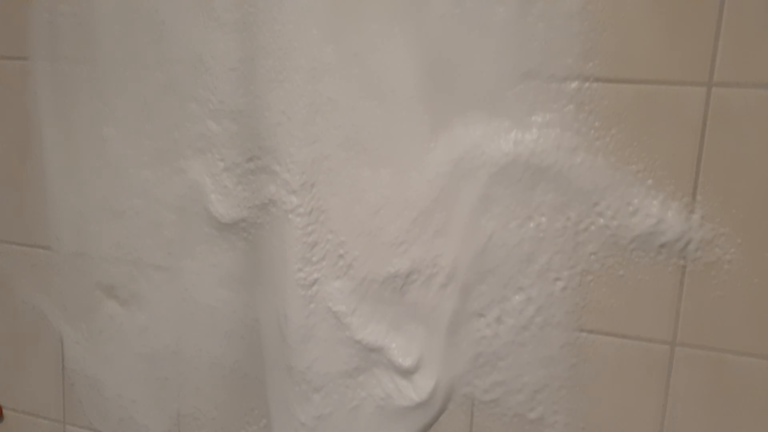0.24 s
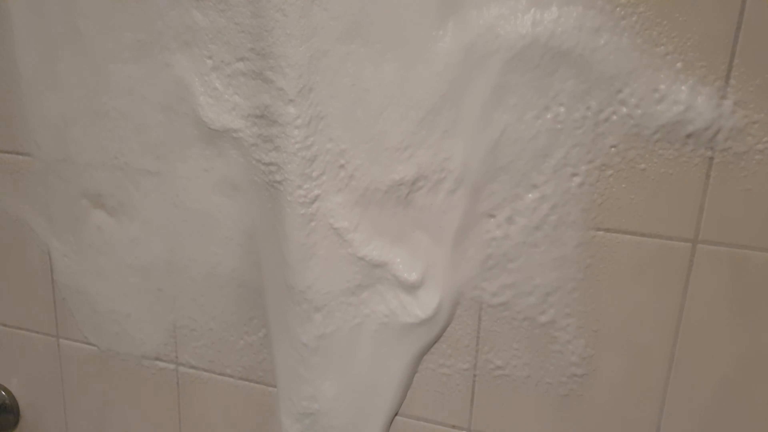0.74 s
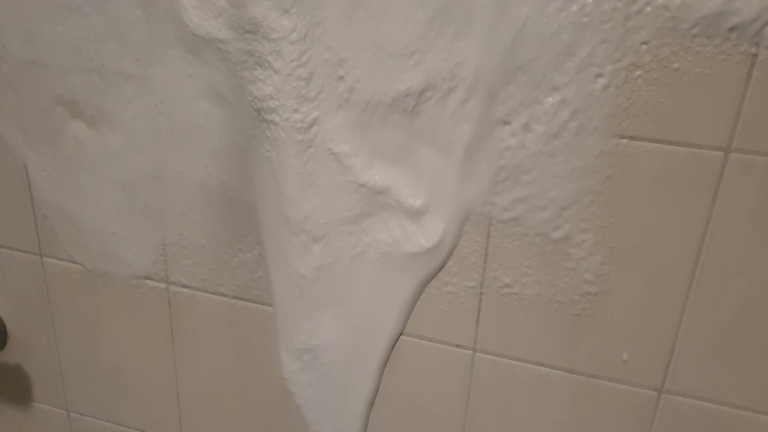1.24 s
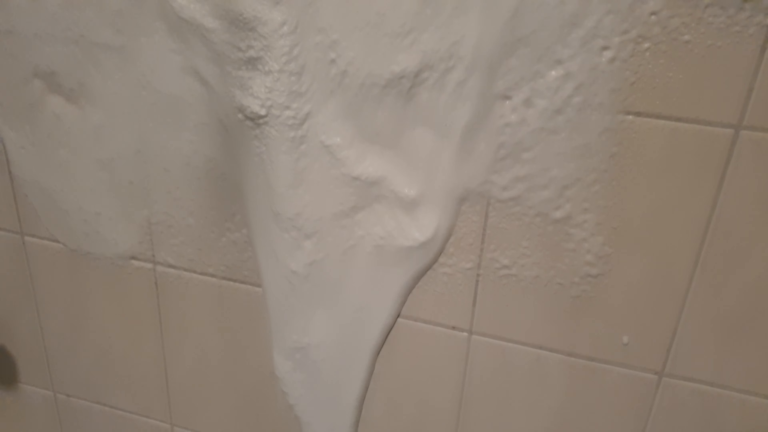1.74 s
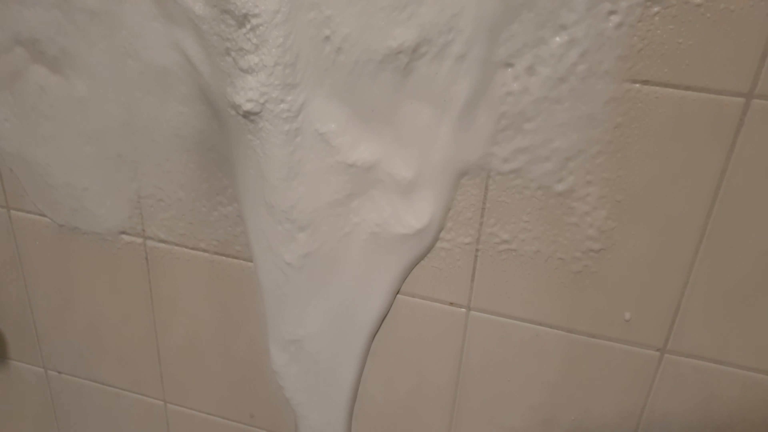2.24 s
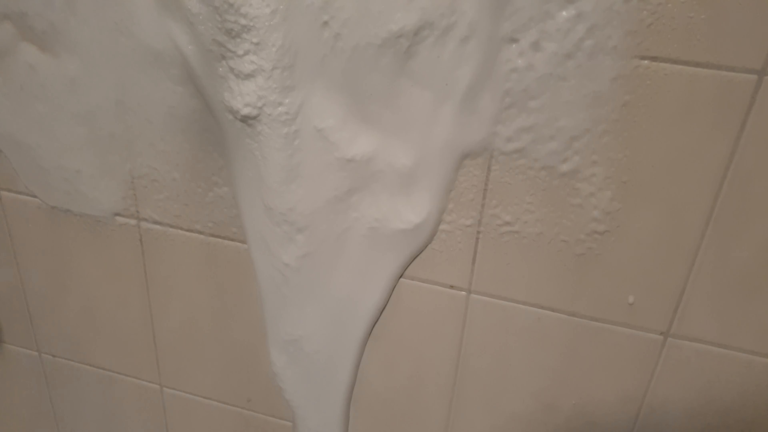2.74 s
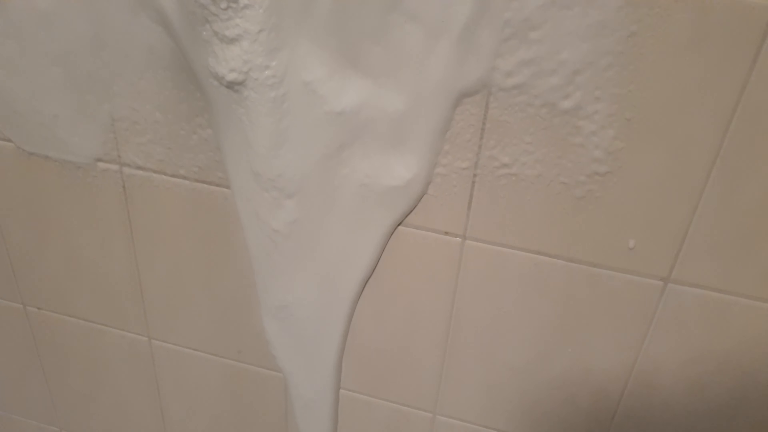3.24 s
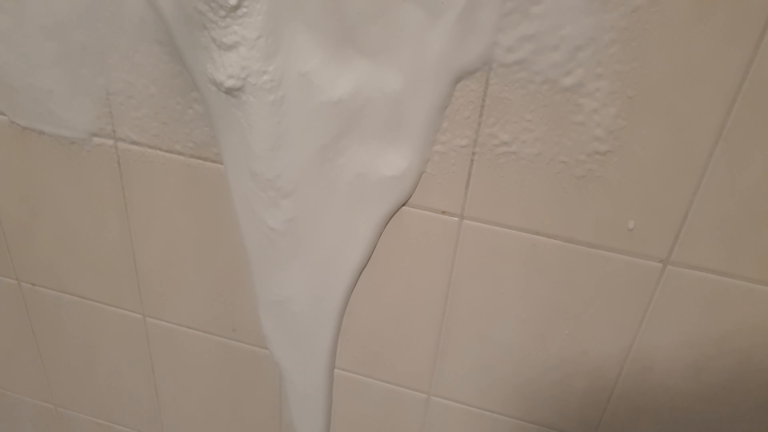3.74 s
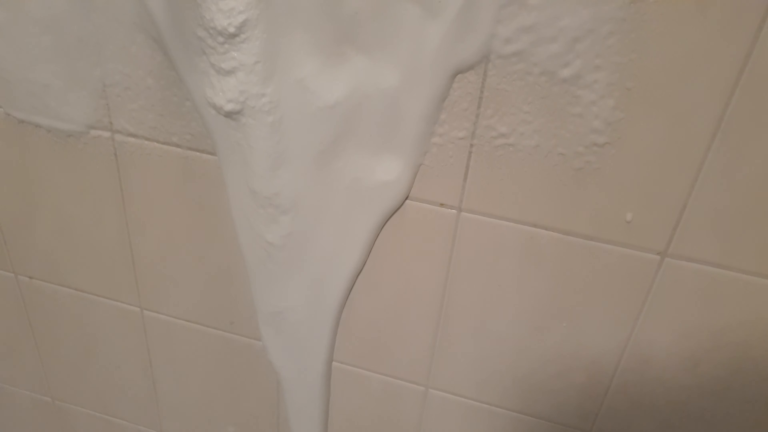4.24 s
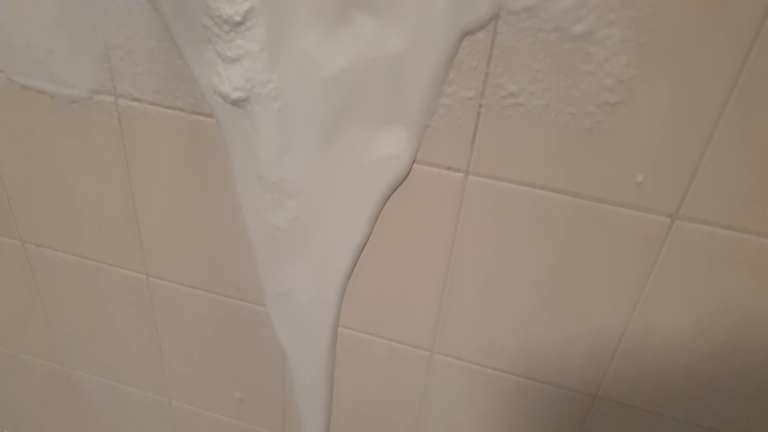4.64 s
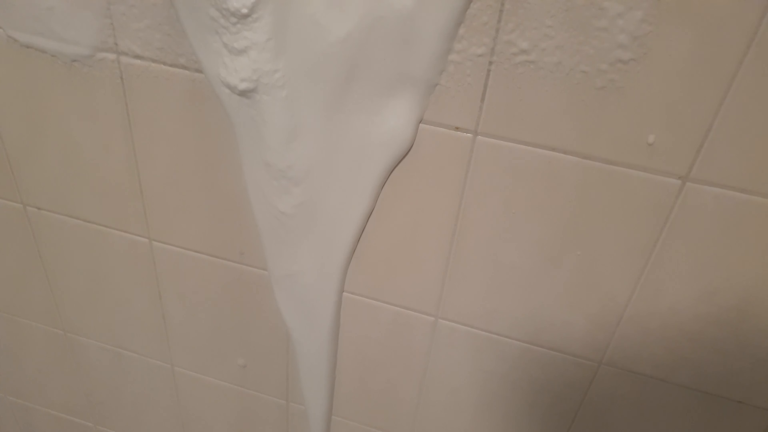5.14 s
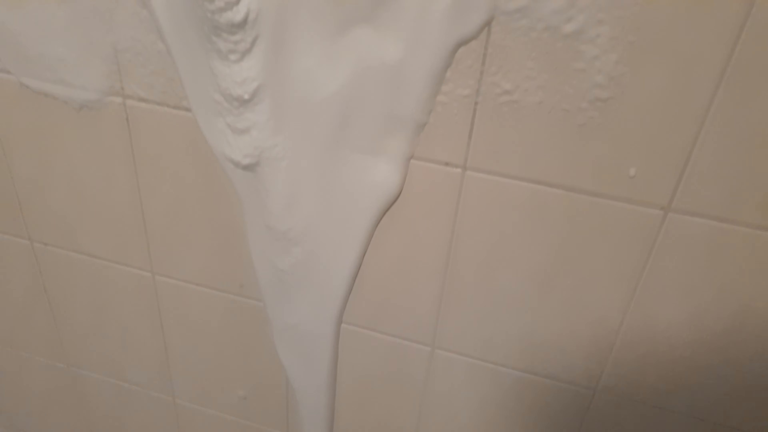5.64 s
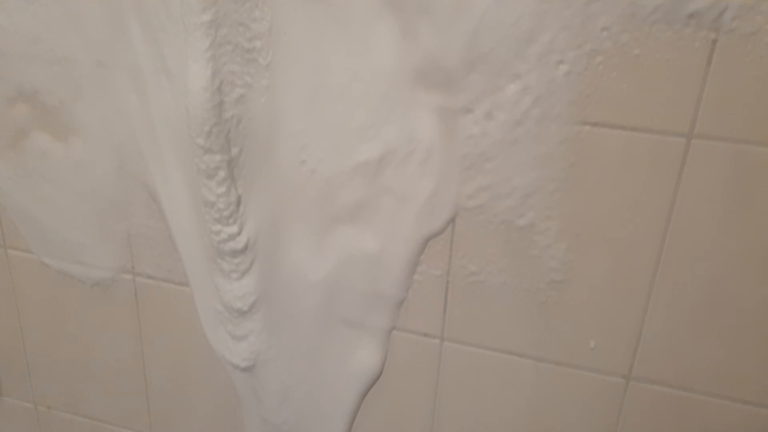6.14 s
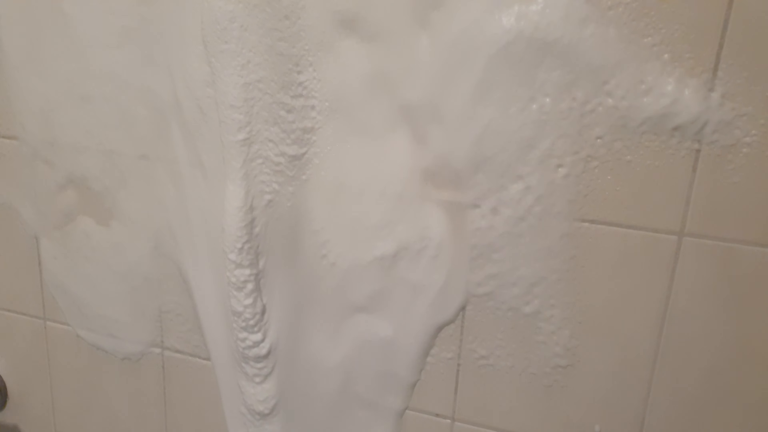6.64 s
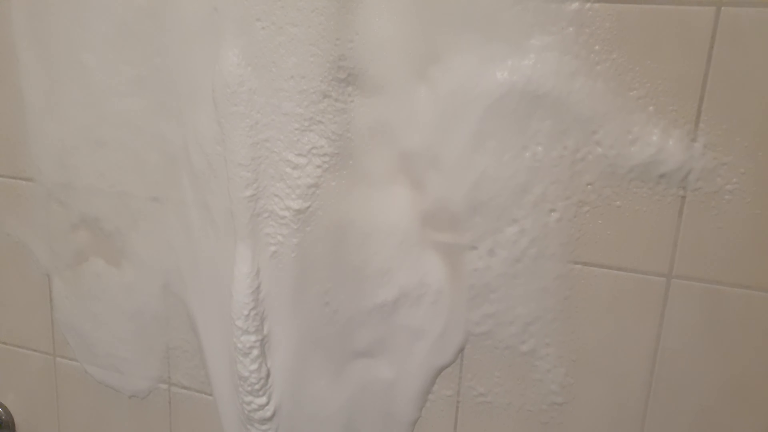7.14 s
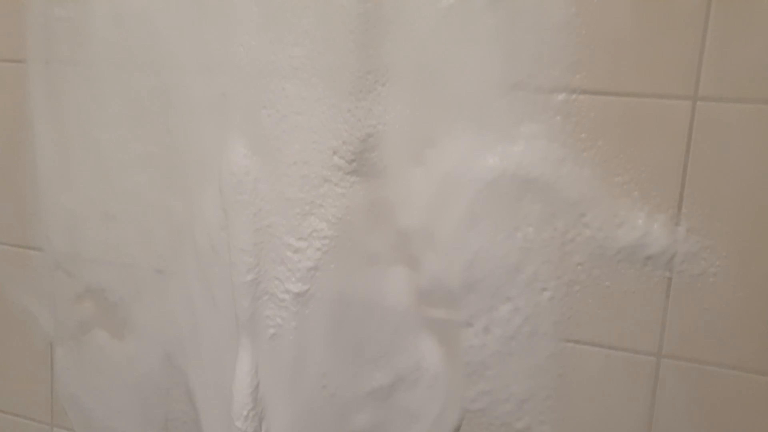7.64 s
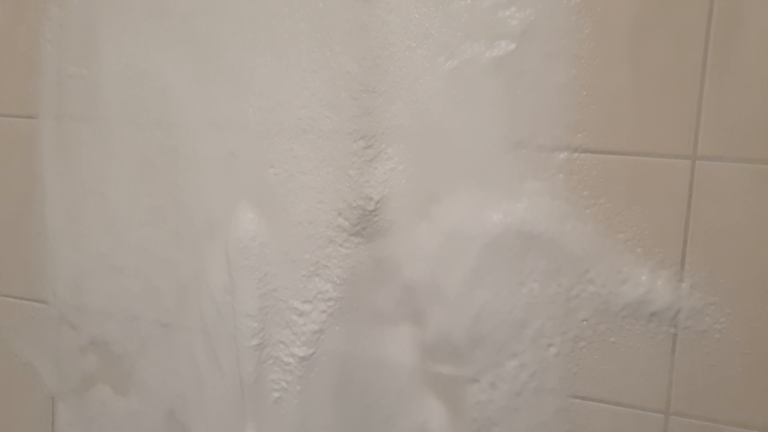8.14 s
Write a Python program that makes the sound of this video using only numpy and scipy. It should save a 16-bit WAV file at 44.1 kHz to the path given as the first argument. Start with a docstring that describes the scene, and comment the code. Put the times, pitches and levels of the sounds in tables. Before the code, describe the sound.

A pump sprayer hisses steadily and brightly at a tiled wall in a small hard room. The fizz flutters and surges slightly. Beneath it the jet howls breathily in the foam, its pitch sinking as it bores a hole, then rising again near six seconds. Close handheld stereo microphones catch soft handling thumps, a hollow plastic bump and a faint low hum.

```python
"""A bright, sputtering hiss: a pump sprayer shoots thick foam at a tiled wall in a small, hard room.
The hiss is noise that follows the flow; the wall's echo, a moving delay, combs it.
The jet howls in the foam, as noise in gliding resonances; the hole it bores adds overtones that sink as it deepens.
A low hum and rumble lie beneath; the hand-held camera thumps softly and a plastic tank bumps hollowly."""
import sys
import numpy as np
from scipy import signal
from scipy.fft import rfft, irfft, next_fast_len
from scipy.io import wavfile
from scipy.ndimage import uniform_filter1d, map_coordinates

SR = 44100
rng = np.random.default_rng(int(sys.argv[2]) if len(sys.argv) > 2 else 0)


def wrap_up_sound(samples):
    """Save the sound to the file named by the first command line argument, as 16-bit audio."""
    columns = np.atleast_2d(samples).T
    # keep every value between -1 and 1, then stretch to whole-number steps
    tamed = np.clip(columns, -1, 1)
    steps = np.round(tamed * 32767).astype(np.int16)
    wavfile.write(sys.argv[1], SR, steps)


N = 370435


def amp(db):
    """Decibels to gain."""
    return 10 ** (np.asarray(db) / 20)


def unit(x):
    """Scale to rms 1."""
    return x / np.sqrt(np.mean(x ** 2) + 1e-20)


def along(points, hz):
    """Interpolate (Hz, value) points on a log-frequency axis."""
    point_hz, value = np.transpose(points)
    return np.interp(np.log(hz + 1), np.log(point_hz + 1), value)


def curves(rows):
    """Interpolate each column after the time at every sample."""
    start_s, *columns = np.transpose(rows)
    t = np.arange(N) / SR
    return [np.interp(t, start_s, column) for column in columns]


def wobble(rate_hz):
    """Smooth random curve, rate_hz knots a second."""
    knots = rng.standard_normal(int(N * rate_hz / SR) + 4)
    return map_coordinates(knots, [np.arange(N) * rate_hz / SR])


def filtered(x, response):
    """Multiply the spectrum of x by a response of frequency in Hz."""
    m = next_fast_len(N + SR // 2)
    hz = np.fft.rfftfreq(m, 1 / SR)
    return irfft(rfft(x, m) * response(hz), m)[..., :N]


def coloured(x, spectrum):
    """Shape x by a spectrum, at rms 1."""
    return unit(filtered(x, lambda hz: amp(along(spectrum, hz))))


def delayed(x, delay_ms):
    """Delay x by a fixed or moving time, read from a 4x oversampled copy."""
    fine = signal.resample_poly(x, 4, 1)
    position = 4 * (np.arange(N) - delay_ms * SR / 1000)
    return np.interp(position, np.arange(len(fine)), fine)


def resonance(centre_hz, width_hz):
    """Noise of rms 1 in one resonance with steep skirts; centre and width fixed or per sample."""
    hz, t, z = signal.stft(rng.standard_normal(N), SR, nperseg=2048)
    sample_s = np.arange(N) / SR
    centre = np.interp(t, sample_s, centre_hz * np.ones(N))
    width = np.interp(t, sample_s, width_hz * np.ones(N))
    hz = hz[:, None] + 1
    detune = (hz ** 2 - centre ** 2) / (hz * width)
    shaped = z / (1 + detune ** 2) / np.sqrt(width)
    return unit(signal.istft(shaped, SR, nperseg=2048)[1][:N])


# left-right likeness in the room: (frequency_hz, likeness [0..1])
ALIKE = [(60, 0.8), (250, 0.85), (520, 0.86), (720, 0.74), (950, 0.2), (2000, 0.015)]


def diffuse(pair):
    """Turn two unrelated signals into a room field: alike in the bass, unrelated in the treble."""
    def mix(hz):
        angle = np.arccos(np.clip(along(ALIKE, hz), -1, 1)) / 2
        return np.array([np.cos(angle), np.sin(angle)])
    mid, side = filtered(pair, mix)
    return np.array([mid + side, mid - side])


def room(x, t60_s=0.47):
    """Tile reverberation at both microphones, as strong as x: decaying noise convolved with x."""
    t = np.arange(SR // 2) / SR
    tail = rng.standard_normal((2, len(t))) * amp(-60 * t / t60_s)
    tail /= np.linalg.norm(tail[0])
    running = np.pad(x, (len(t), 0), mode="wrap")[None]  # the room already sounds at the start
    wet = signal.fftconvolve(running, tail, axes=1)[:, len(t):][:, :N]
    return diffuse(wet)


# paths to the camera: (start_s, wall_echo_delay_ms, left_lead_ms, right_direct_db)
WALL = [(0, 1.68, .342, 0), (.6, 1.565, .313, 0), (1.3, 1.437, .32, -2), (2.2, 1.315, .322, -2),
        (2.7, 1.285, .321, -3.5), (3.6, 1.205, .317, -4.5), (5.45, 1.203, .305, -3.5),
        (6.3, 1.42, .312, -1), (6.85, 1.535, .29, 0), (7.3, 1.715, .268, 0), (7.9, 1.8, .268, 0),
        (8.4, 1.77, .279, 0)]
# the nozzle beams its top treble at the wall: (frequency_hz, echo_level_db)
BEAM = [(3000, -7), (9000, -6), (11800, 0)]


def direct(x, echo):
    """Sound reaches the left microphone first; the wall's echo reaches both together, stronger on the right."""
    wall_ms, lead_ms, right_db = curves(WALL)
    nearness = (wall_ms.min() / wall_ms) ** 2  # the echo fades as the wall recedes
    facing = np.array([[.55], [1]])  # echo gain: left, right
    beamed = filtered(x, lambda hz: amp(along(BEAM, hz)))
    first = np.array([x, amp(right_db) * delayed(x, lead_ms)])
    reflected = echo * facing * nearness * delayed(beamed, wall_ms)
    return unit(first + reflected)


def patchy(x, depth_db):
    """Narrow patches of the noise swell and fade at random."""
    z = signal.stft(x, nperseg=512)[2]
    field = uniform_filter1d(rng.standard_normal(z.shape), size=2, axis=1)  # across frequency
    field = uniform_filter1d(field, size=45, axis=2)  # across time
    return signal.istft(z * amp(depth_db * unit(field)), nperseg=512)[1][:, :N]


def hiss(spectrum, flow_db, echo, room_db, grain_db, patchy_db):
    """Tiny noise bursts heard directly, over a room wash that smears the flow's flutter."""
    bursts = rng.standard_normal(N) * amp(flow_db + grain_db * wobble(2500))
    smeared_db = uniform_filter1d(flow_db, size=1500)
    wash = patchy(diffuse(rng.standard_normal((2, N))), patchy_db) * amp(smeared_db)
    return unit(direct(coloured(bursts, spectrum), echo) + amp(room_db) * coloured(wash, spectrum))


# the jet's surges about its usual strength: (start_s, flow_db)
JET = [(0.0, 0), (0.42, -0.2), (0.81, 2), (1.1, -1), (1.34, 1), (1.51, -1.5), (1.94, 2), (2.03, -0.9),
       (2.1, 4.5), (2.16, 1), (2.36, 1.5), (2.64, 0), (3.15, 0.7), (3.19, 2), (3.63, 1.6), (3.78, 3.5),
       (3.83, 0.5), (4.06, -0.5), (4.13, -1.5), (4.41, 4), (4.54, 0.6), (4.68, 2.2), (4.81, 1), (4.86, 2),
       (5.05, -2.3), (5.25, 3), (5.29, 1), (5.56, 3.5), (5.75, 0.5), (5.78, -1.3), (6.08, 2.5), (6.15, 0.7),
       (6.54, 2.5), (6.85, 0.5), (7.13, 0.5), (7.28, -0.3), (7.52, -0.2), (8.03, 1), (8.12, 2),
       (8.41, -0.5)]
# spectrum of the bright fizz: (frequency_hz, relative_level_db)
FIZZ = [(3000, -40), (6000, -21), (7800, -15.5), (9000, -8.5), (10400, -8.8), (11300, -1.1), (13500, -.2),
        (15700, .9)]
# spectrum of the broad rush: (frequency_hz, relative_level_db)
RUSH = [(100, -32), (340, -17), (480, -5.5), (900, -4), (1400, -8.5), (2300, -0.84), (3300, 0.5),
        (5000, -3), (6500, -1.5), (7600, -6), (12000, -2), (16000, -23)]
FIZZ_DB, RUSH_DB = -20.5, -29  # at the usual flow, the rush at the mean echo delay
RUSH_DB_PER_FLOW_DB = 0.17
RUSH_DB_PER_MS = -2  # the rush fades as the wall's echo comes later


def nozzle(sputter_db=-0.07, flutter_db=1.6, rush_share=0.76, echo=.58):
    """Air and suds tear out unevenly: a bright fizz over a broad rush, both following the flow."""
    jet_db, = curves(JET)
    wall_ms = curves(WALL)[0]
    flow_db = sputter_db * wobble(35) + flutter_db * wobble(140)
    fizz = hiss(FIZZ, flow_db, echo, room_db=-2.5, grain_db=-1.0, patchy_db=3.4)
    rush = hiss(RUSH, rush_share * flow_db, echo, room_db=14.0, grain_db=3.0, patchy_db=3.0)
    distance_db = RUSH_DB_PER_MS * (wall_ms - wall_ms.mean())
    rush_db = RUSH_DB + RUSH_DB_PER_FLOW_DB * jet_db + distance_db
    return amp(FIZZ_DB + jet_db) * fizz + amp(rush_db) * rush


def throat(centre_hz=1460, width_hz=970, level_db=-44.5):
    """The nozzle's short tube rings broadly, close to the camera and dry."""
    return amp(level_db) * direct(resonance(centre_hz, width_hz), echo=0.05)


def from_wall(x, room_db, count=4):
    """Sound made in the foam, heard directly and through the room, as strong as x."""
    place = np.linspace(0, count - 1, N)  # the room answers differently as the camera moves
    answer = 0
    for k in range(count):
        fade = np.cos(np.pi / 2 * np.clip(place - k, -1, 1))
        answer = answer + fade * room(x)
    return np.std(x) * unit(direct(unit(x), echo=0.049) + amp(room_db) * unit(answer))


# bored hole's overtone, sinking as the hole deepens: (start_s, pitch_hz, level_db)
OVERTONE = [(0, 2450, -48), (.55, 2180, -43), (1.1, 1980, -40), (1.6, 1780, -37), (2.2, 1660, -40),
            (2.8, 1540, -36.5), (3.25, 1430, -37), (3.9, 1280, -38.5), (4.7, 1150, -40.5), (5.3, 1120, -40),
            (6, 1100, -54)]
# its upper overtone, sinking, then rising as the hole fills: (start_s, pitch_hz, level_db)
UPPER_OVERTONE = [(2, 2750, -48), (3, 2470, -42), (4.1, 2050, -48), (4.6, 1500, -43), (5, 1570, -38.5),
                  (5.55, 1680, -36), (5.8, 1690, -43), (6.1, 1760, -52)]
# shallow dent under a moving jet: (start_s, level_db)
DENT = [(.1, -39.5), (.7, -52), (5.5, -56), (6.1, -39), (7, -41.5), (8.4, -42.5)]


def overtones(bore_q=3.8, dent_hz=1110, dent_width_hz=400):
    """A bored hole rings in two gliding resonances, wider when higher; a dent rings mainly before and after."""
    hole = 0
    for rows in (OVERTONE, UPPER_OVERTONE):
        pitch_hz, level_db = curves(rows)
        hole = hole + amp(level_db) * resonance(pitch_hz, pitch_hz / bore_q)
    dent_db, = curves(DENT)
    return hole + amp(dent_db) * resonance(dent_hz, dent_width_hz)


# lowest resonance of the hollow dug in the foam, level before the bass cut:
# (start_s, pitch_hz, width_hz, level_db)
HOLLOW = [(0, 840, 300, -38), (.6, 700, 220, -35.5), (1.3, 650, 204, -34), (1.62, 620, 198, -30),
          (2, 606, 228, -33), (3.1, 588, 250, -32.5), (3.9, 560, 219, -35), (4.7, 582, 206, -35.5),
          (5.1, 554, 190, -32), (5.6, 595, 260, -35), (5.9, 740, 385, -37.5), (6.2, 910, 310, -36),
          (7.1, 890, 270, -37.5), (7.7, 836, 285, -38), (8.4, 760, 220, -33)]


def foam(churn_db=0.3, level_db=0, lowest_hz=455):
    """The jet churns the foam on the wall and blows across the hollow it has dug."""
    hollow_hz, width_hz, hollow_db = curves(HOLLOW)
    howl = amp(hollow_db) * resonance(hollow_hz, width_hz)
    # a small hollow radiates no bass
    howl = filtered(howl, lambda hz: 1 / np.hypot(1, (lowest_hz / (hz + 1)) ** 8))
    churn = amp(level_db + churn_db * wobble(45))
    return churn * (from_wall(howl, room_db=3.5) + from_wall(overtones(), room_db=15))


# spectrum of the room's rumble: (frequency_hz, relative_level_db)
FLOOR = [(20, -32), (40, -23), (55, -4), (75, -9), (100, 3.5), (125, -8.5), (200, -6.5), (280, -2.5),
         (500, -14), (1500, -48)]


def background(hum_hz=55, hum_db=-58.5, floor_db=-57.0):
    """A sine hum wavers in level and phase over the room's faint noise rumble."""
    t = np.arange(N) / SR
    swell = 1 + 0.79 * wobble(25)
    hum = unit(swell * np.sin(2 * np.pi * hum_hz * t + 1.5 * wobble(9)))
    rumble = coloured(diffuse(rng.standard_normal((2, N))), FLOOR)
    sides = amp([[-2], [1]])  # hum gain: left, right
    return amp(hum_db) * hum * sides + amp(floor_db) * rumble


# handling thumps, envelope peak before the left-right gains: (start_s, peak_db, pitch_hz)
THUMPS = [(0.315, -41, 95), (0.555, -39, 85), (0.963, -33, 75), (1.878, -35, 62), (5.185, -41, 60),
          (5.506, -42, 80), (5.967, -42, 70), (6.442, -33, 65), (7.968, -38, 68)]


def handling(swell_s=0.0057):
    """The hand pushes on the camera: a few soft low cycles, stronger on the right."""
    out, t = np.zeros(N + SR), np.arange(SR // 4) / SR
    push = (t / swell_s / 2) ** 2 * np.exp(2 - t / swell_s)
    for start_s, peak_db, pitch_hz in THUMPS:
        thump = amp(peak_db) * push * np.sin(2 * np.pi * pitch_hz * t)
        out[round(start_s * SR):][:len(t)] += thump
    return out[:N] * amp([[-8], [3]])


# hollow bumps, as of a plastic tank: (start_s, relative_level_db)
BUMPS = [(2.42, -45), (2.469, -50), (6.279, -35.5), (6.345, -42), (6.381, -40)]
# the tank's modes, nominal: (pitch_hz, relative_level_db, t60_s)
TANK = [(150, -7, 0.11), (201.4, -7, 0.56), (222, 1.5, 0.1), (299, -8, 0.18), (335, -11, 0.18)]


def tank(attack_s=0.009):
    """Soft bumps ring the plastic tank's decaying modes close to the camera, with a little of the room."""
    out, t = np.zeros(N + SR), np.arange(SR // 2) / SR
    for start_s, bump_db in BUMPS:
        ring = np.zeros(len(t))
        for pitch_hz, mode_db, t60_s in TANK:
            decay = amp(mode_db + rng.normal(0, 1) - 60 * t / t60_s)
            struck_hz = pitch_hz * (1 + rng.normal(0, 0.02))
            ring += decay * np.sin(2 * np.pi * struck_hz * t)
        out[round(start_s * SR):][:len(t)] += amp(bump_db) * ring * (1 - np.exp(-t / attack_s))
    return amp(7) * out[:N] + amp(2) * room(out[:N])


def scene():
    """Spray, foam and the small noises around them."""
    return nozzle() + throat() + foam() + background() + handling() + tank()


# left-minus-right response of the microphone ports: (frequency_hz, difference_db)
TILT = [(100, 0), (1500, .3), (3500, -.3), (5700, 1), (6500, -.5), (7400, -6), (8000, -2.5), (8900, -5.5),
        (10200, -2), (11200, -5), (12700, -.3)  , (14500, .6), (15600, 2.5)]


def record(dry, top_hz=15800):
    """The two microphone ports colour the treble differently; nothing passes above the band limit."""
    def response(hz):
        tilt_db = along(TILT, hz)
        return amp(np.array([tilt_db, -tilt_db]) / 2) * (hz < top_hz)
    return filtered(dry, response)


dry = scene()
out = record(dry)
wrap_up_sound(out)
```